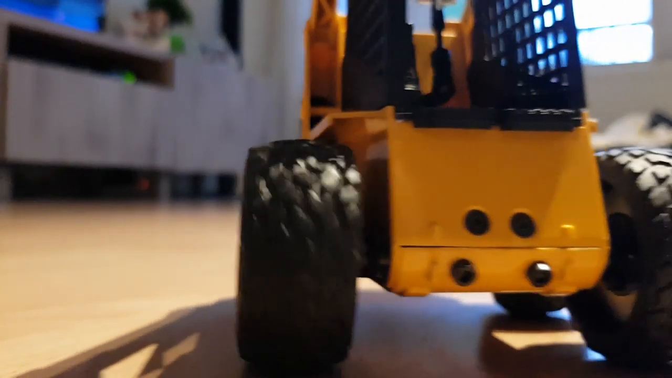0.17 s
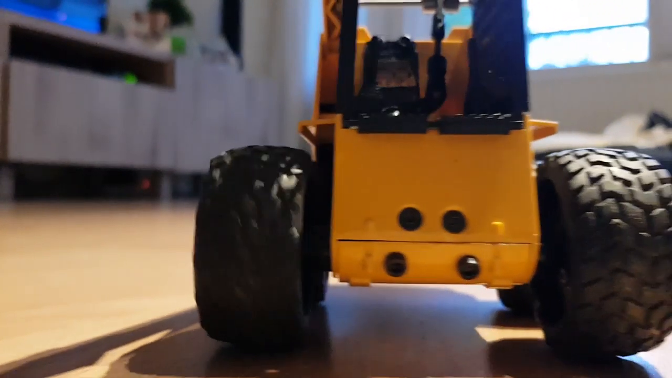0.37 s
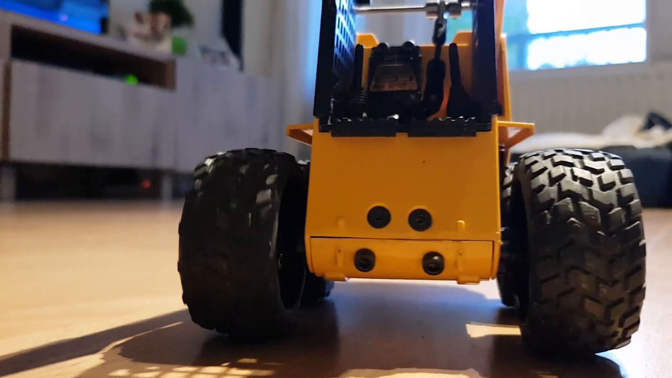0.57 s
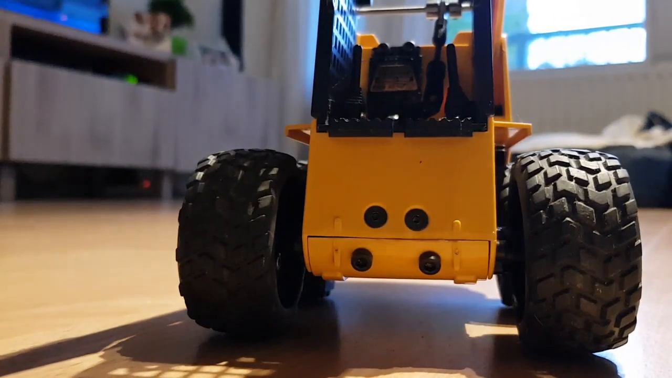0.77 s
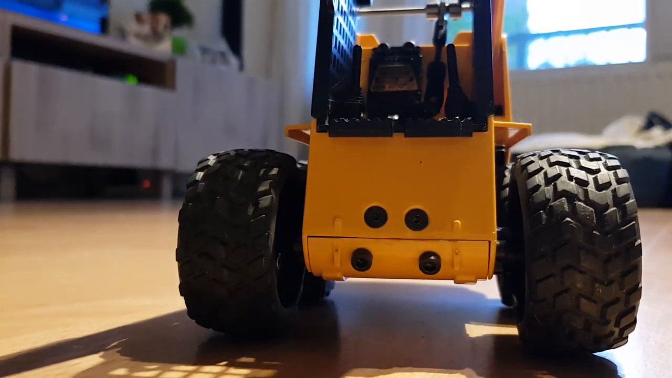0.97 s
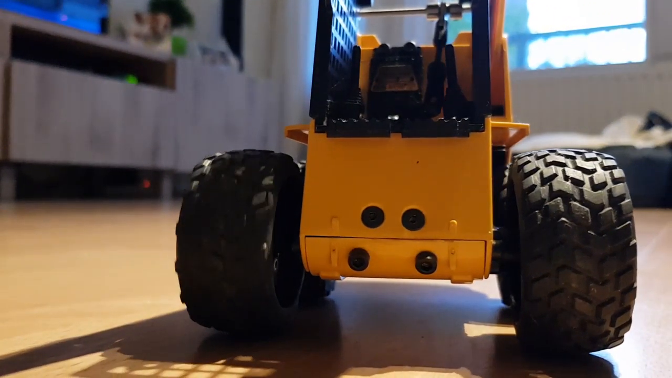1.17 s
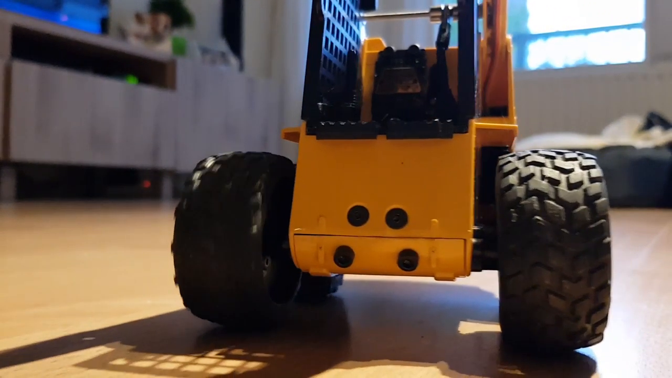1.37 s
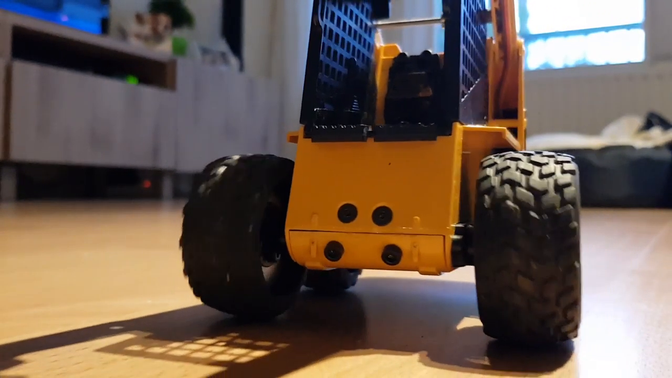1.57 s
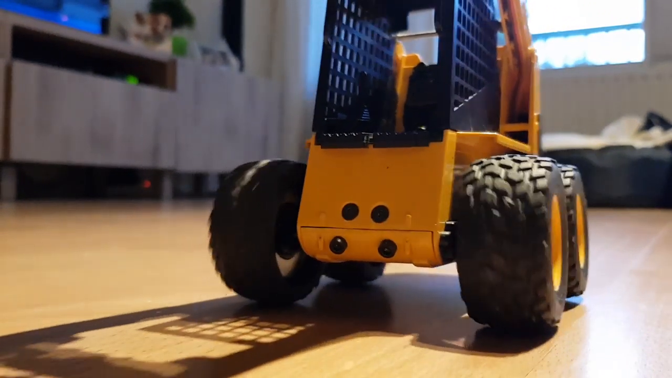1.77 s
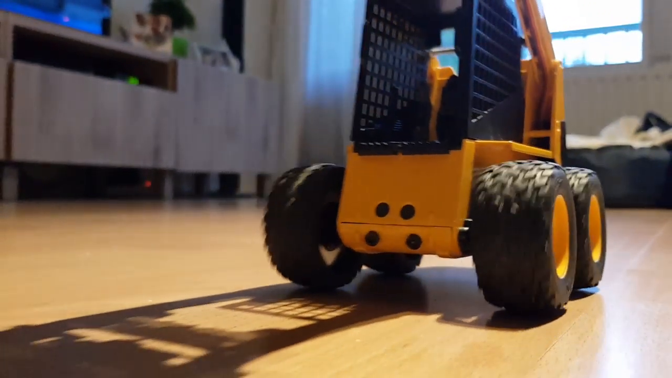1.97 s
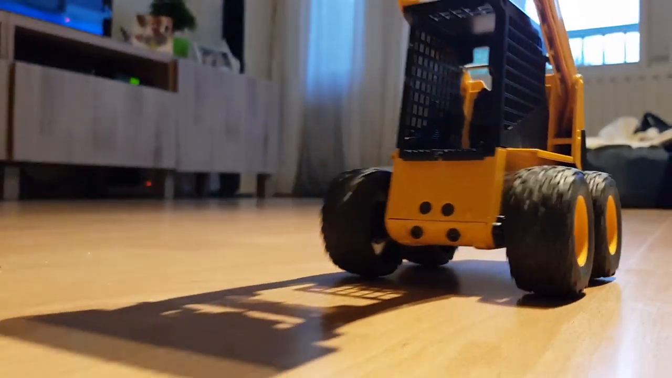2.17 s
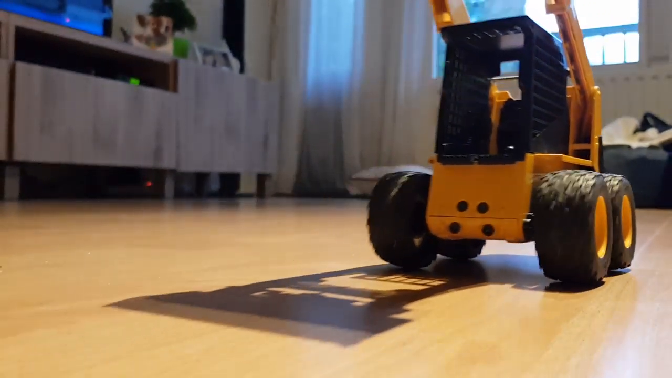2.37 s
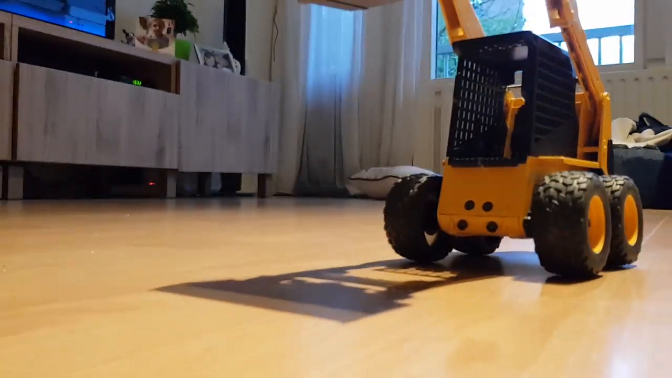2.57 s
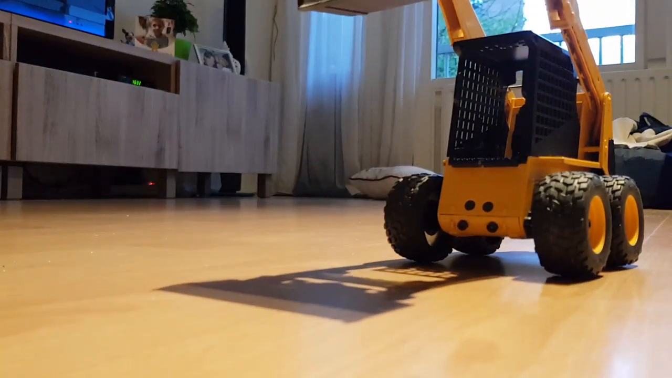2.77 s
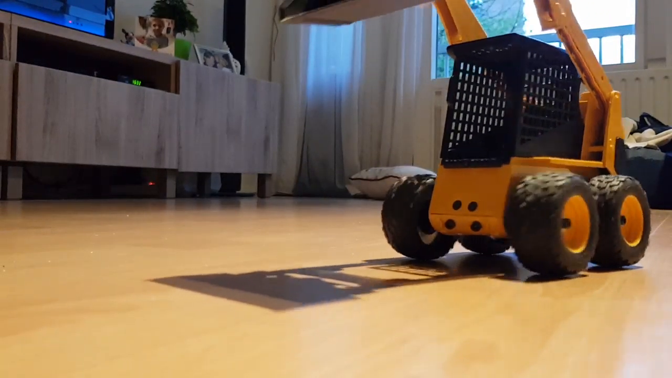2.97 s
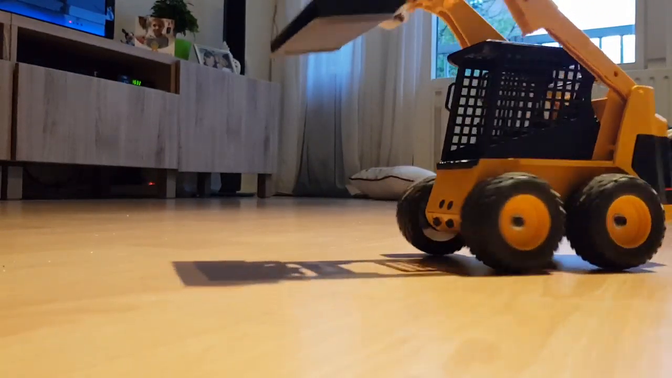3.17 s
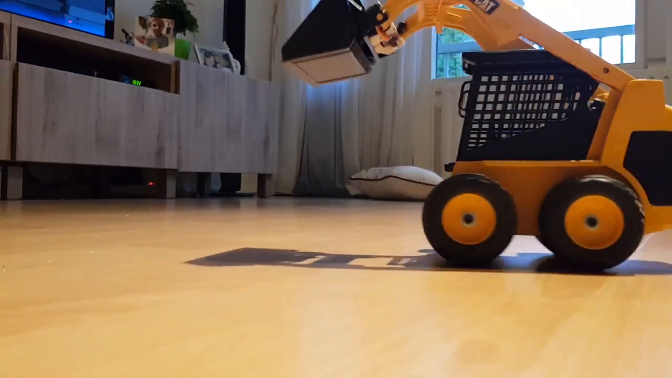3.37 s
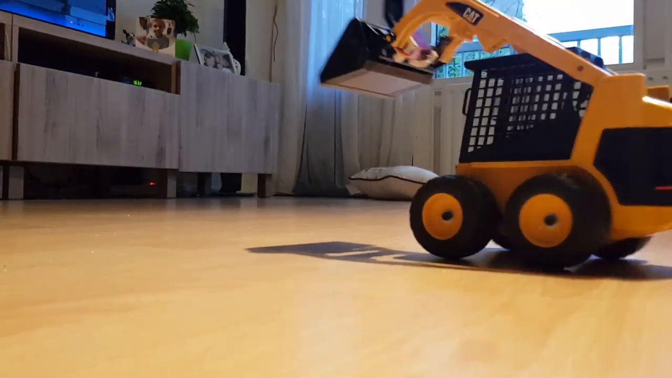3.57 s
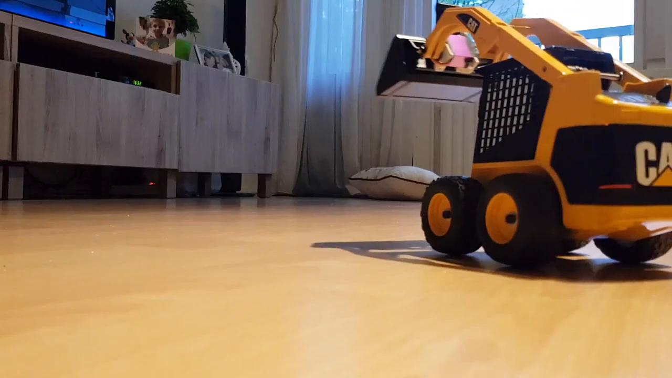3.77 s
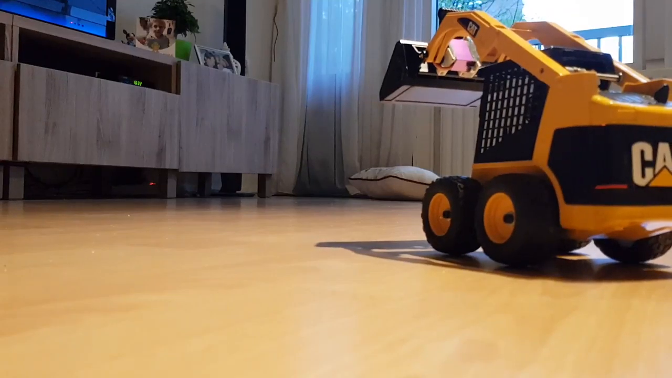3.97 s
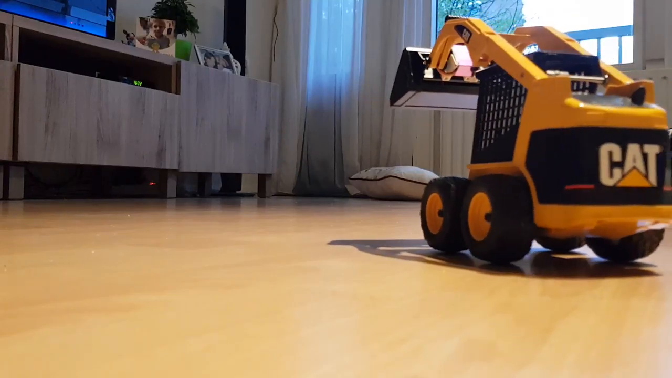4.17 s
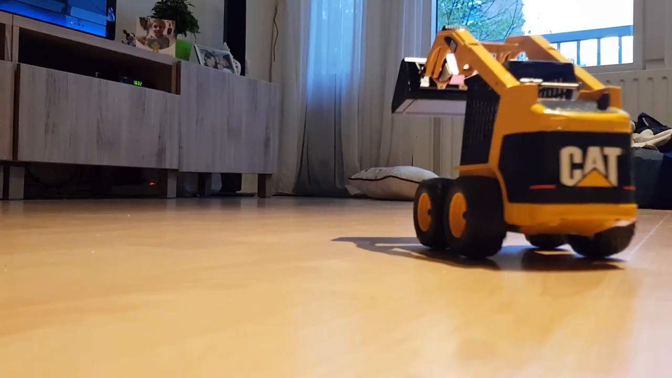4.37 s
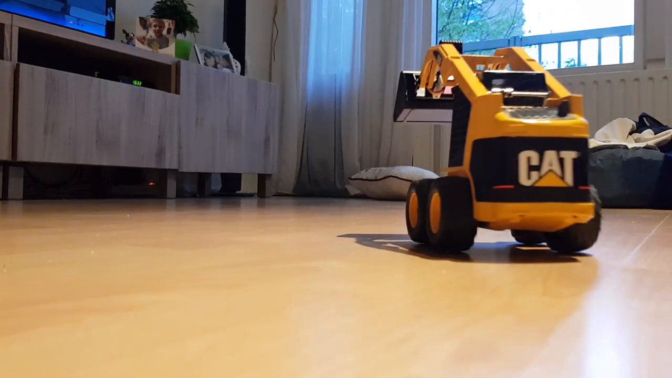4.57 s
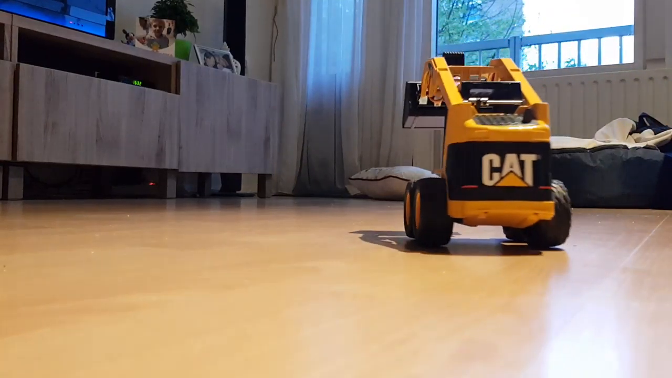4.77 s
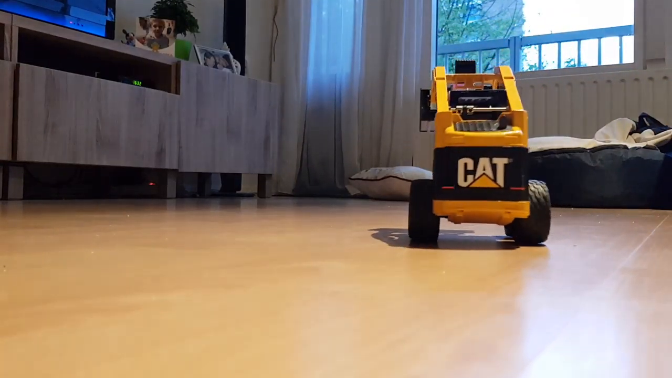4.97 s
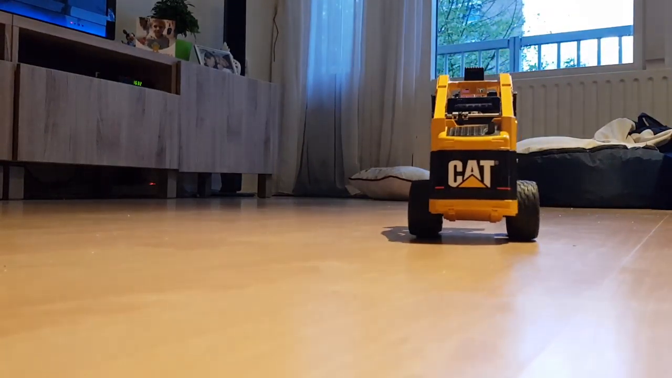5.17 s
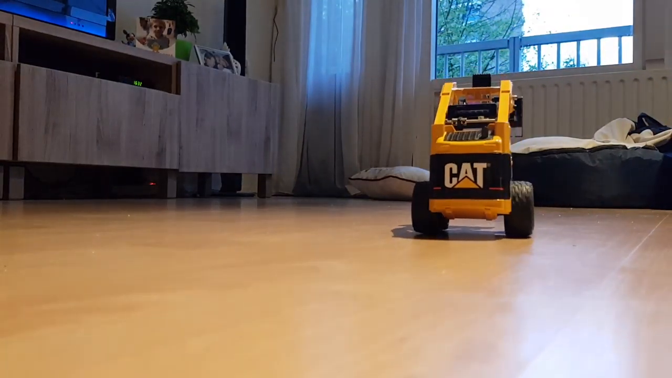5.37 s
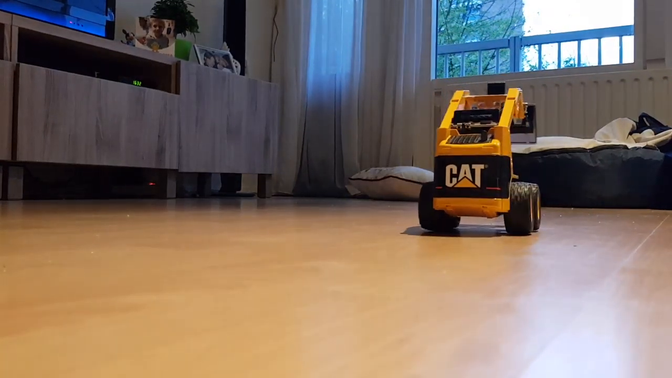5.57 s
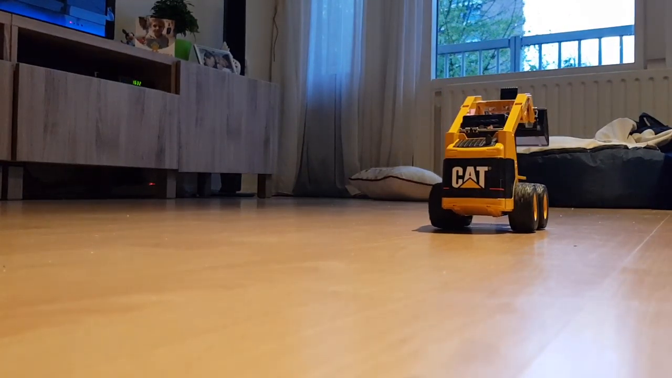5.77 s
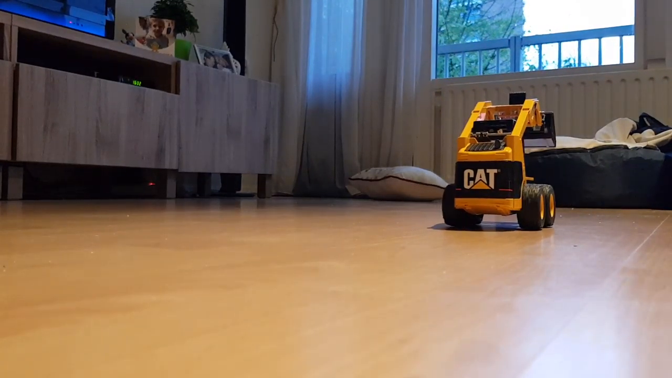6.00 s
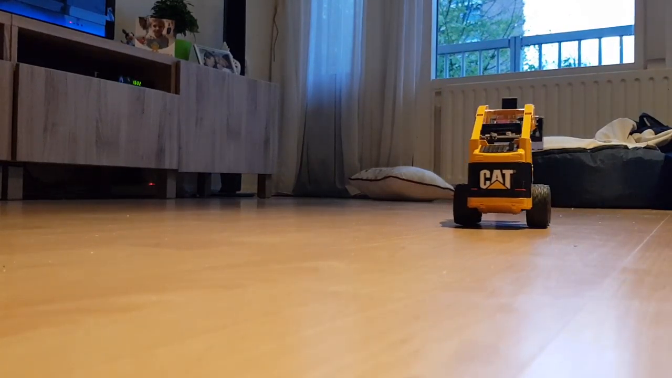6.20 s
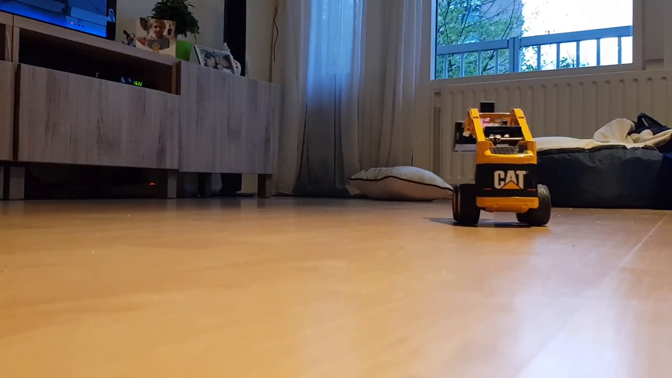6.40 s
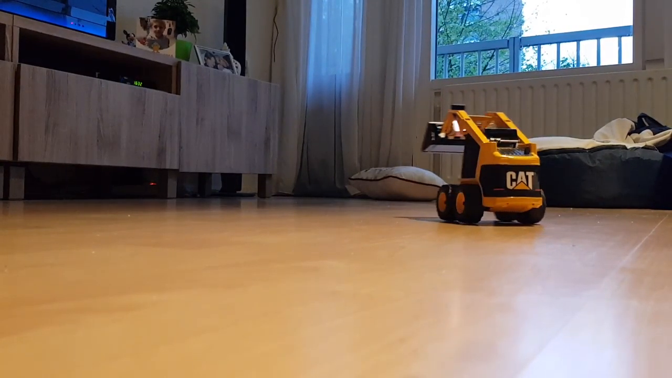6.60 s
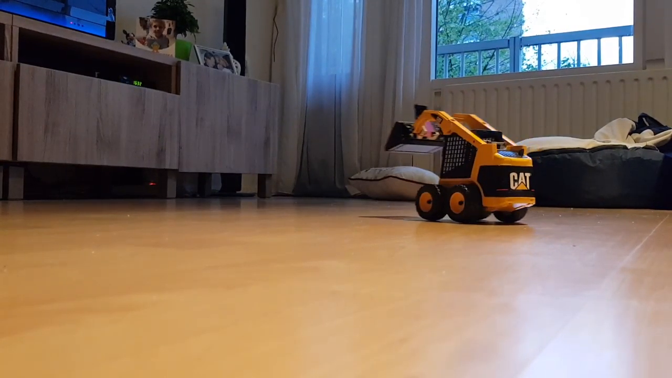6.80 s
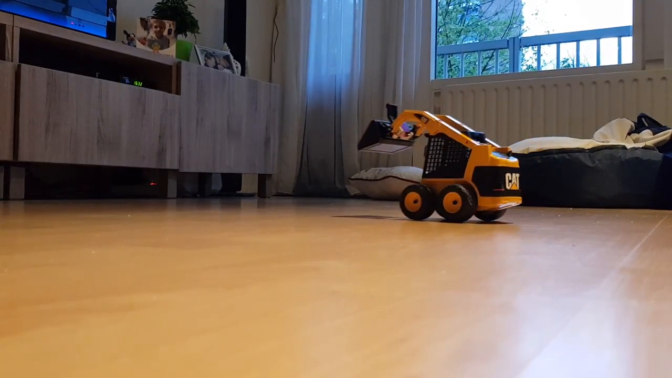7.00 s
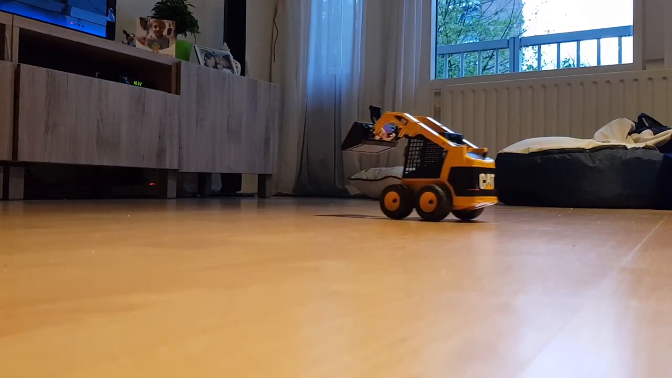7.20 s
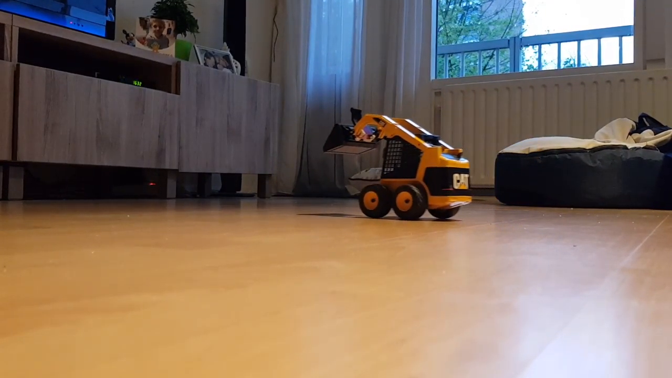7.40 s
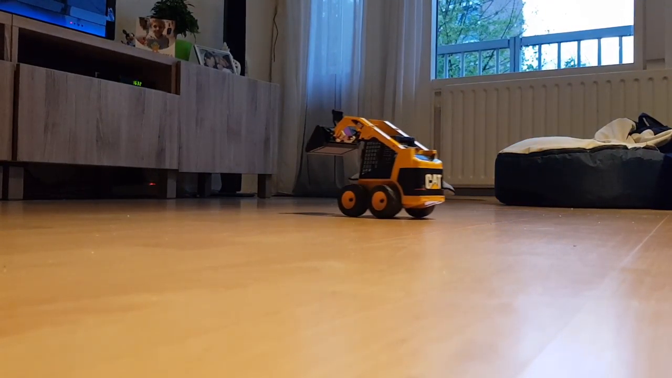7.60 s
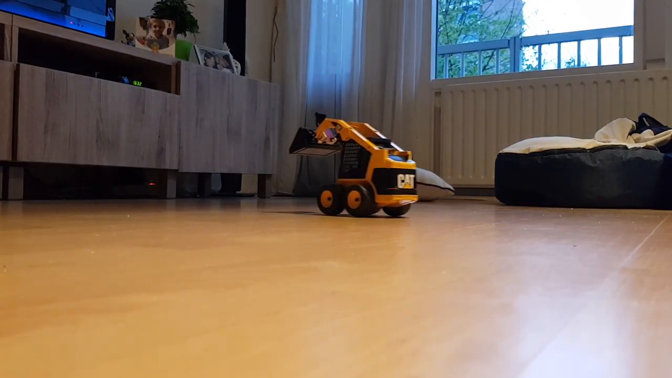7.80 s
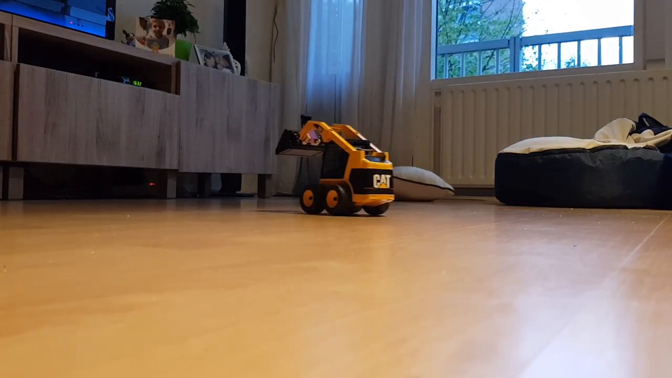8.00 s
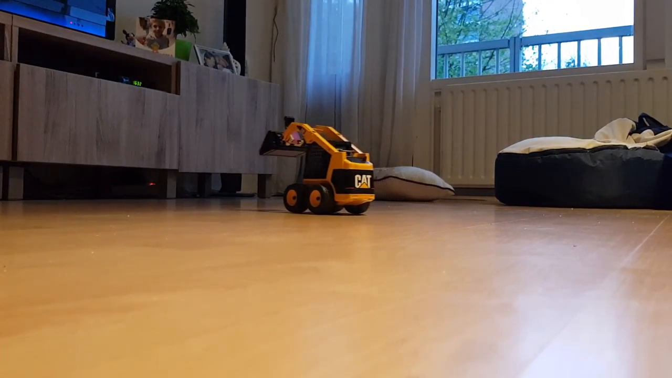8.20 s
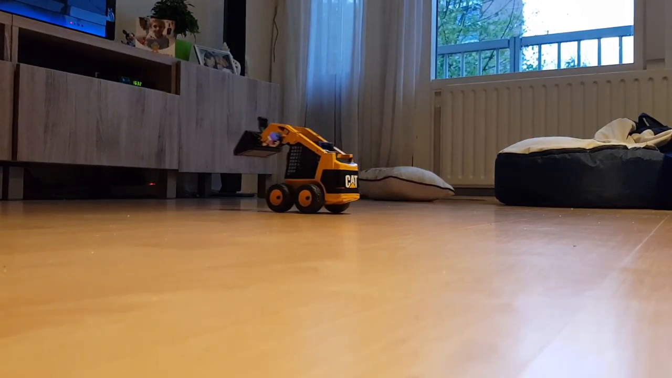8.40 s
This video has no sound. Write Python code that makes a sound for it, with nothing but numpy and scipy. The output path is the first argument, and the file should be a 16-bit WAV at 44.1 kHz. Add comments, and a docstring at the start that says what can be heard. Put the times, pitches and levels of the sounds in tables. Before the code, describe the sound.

Small motors and plastic gears of a toy vehicle whir indoors, stopping briefly three times, with clicks, thin whistles and little squeaks.

```python
"""Toy loader on a living-room floor.

A remote-controlled loader drives and turns on laminate, stopping three times, and shows its front,
flanks and rear to a close pair of microphones. Two motors rattle plastic gears in a hollow shell; the
teeth whine with speed, and the speed controller whistles as a motor pulls away. Axles squeak, slack
gears tick at rest and the tyres rumble on the boards, over short echoes and a low room tone."""
import sys
import numpy as np
from scipy import signal
from scipy.fft import rfft, irfft
from scipy.io import wavfile
from scipy.ndimage import uniform_filter1d, map_coordinates

SR = 44100
rng = np.random.default_rng(int(sys.argv[2]) if len(sys.argv) > 2 else 0)


def inscribe(sig):
    """Save sig as 16-bit PCM at rate SR to the path in sys.argv[1].

    A 1-D sig is mono; a 2-D sig holds one channel per row.
    Samples are clipped to [-1, 1] before scaling.
    """
    pcm = np.round(np.clip(np.atleast_2d(sig).T, -1, 1) * 32767)
    wavfile.write(sys.argv[1], SR, pcm.astype(np.int16))


N = 372644
T = np.arange(N) / SR
HZ = np.fft.rfftfreq(N, 1 / SR) + 1e-3
RADIO_FRAME_S = .0219


# Shell resonances, by the side turned to the microphones: pitch_hz, width_hz, level_db
FRONT_MODES = [(1430, 190, -6.5), (1980, 320, -1.5), (2400, 170, -2), (2560, 160, -1), (3210, 120, 2),
               (3400, 65, -1), (3520, 190, 2), (4040, 140, -7.5)]
CORNER_MODES = [(1260, 77, 1), (1500, 180, 2.5), (1850, 68, 4), (2400, 210, -15), (2971, 630, -1),
                (3570, 360, 1), (3830, 250, 0.5)]
FLANK_MODES = [(1194, 98, 0.5), (1620, 1200, 0), (1840, 130, 3.5), (2662, 210, 2), (3390, 630, 5),
               (3675, 250, -7)]
REAR_MODES = [(1161, 470, -8), (1380, 222, -18), (1590, 61, -4), (1850, 71, -1), (2620, 140, -3),
              (3540, 460, -2)]
FAR_FLANK_MODES = [(1282, 520, -10), (1591, 92, -1.5), (1977, 240, -7), (2453, 230, -7), (2800, 252, -6),
                   (3249, 2200, -2.5)]
# Spectrum of the tooth rasp from the same five sides: frequency_hz, level_db
FRONT_RASP = [(2350, -25), (4000, -7), (4170, -2), (4520, 1), (4900, -4.5), (5630, -1), (6510, -2),
              (7400, 4.5), (8360, 2.5), (8850, 1), (10500, 2), (11600, -3.5), (12500, 2.5), (15200, -14),
              (16000, -4)]
CORNER_RASP = [(2350, -48), (4000, -7.5), (4900, -3.5), (5700, -6.5), (6290, -3.5), (6820, -5.5), (7930, 4),
               (9220, -3.5), (10600, 0.5), (11800, -5), (12800, -5), (14000, -9), (15500, -14),
               (16000, -24)]
FLANK_RASP = [(2350, -22), (4000, 0), (4140, -4.5), (4730, -4), (6070, 0.5), (7060, -3), (7570, 2),
              (7930, 2.5), (9170, -1.5), (10500, 0.5), (15200, -8), (16000, -26)]
REAR_RASP = [(2350, -5.5), (4000, -13), (4410, -3.5), (5070, -6.5), (5800, -6.5), (7060, -3.5), (7930, 2),
             (8500, -1), (10800, -3), (13400, -11), (14800, -12.5), (15500, -15), (16000, -6)]
FAR_FLANK_RASP = [(2350, -31), (4000, -4), (5310, -4.5), (5700, -3.5), (6140, 1.5), (6860, -4.5),
                  (7750, 2.5), (9280, 0.5), (10100, 1), (13600, -8.5), (15200, -14), (16000, -24)]

def gearboxes():
    """Two gear trains at each microphone: burrs rasp and ring the shell, meshing teeth whine."""
    rasp_gain, shell_gain = drive_gains()
    tooth_hz, pinion_hz = gear_rates()
    facing, = curves(SIDE_SHOWN)
    knocks = clatter(tooth_hz, scatter_db=6, slop_s=.00004, wobble=.18)
    knocks += clatter(pinion_hz / 2, scatter_db=-.5, slop_s=.00005, wobble=.46)
    # teeth slide between knocks; short waves leave the shell differently towards each microphone
    sliding = rng.standard_normal((2, N))
    shell_drive = knocks + undb(3) * rng.standard_normal(N) + undb(3.5) * sliding
    rasp_drive = knocks + undb(9.5) * sliding
    sides = [(FRONT_MODES, FRONT_RASP), (CORNER_MODES, CORNER_RASP), (FLANK_MODES, FLANK_RASP),
             (REAR_MODES, REAR_RASP), (FAR_FLANK_MODES, FAR_FLANK_RASP)]
    shell = rasp = 0
    for side, (modes, spectrum) in enumerate(sides):
        share = np.clip(1 - abs(facing - side), 0, 1)
        shell += share * ring(shell_drive, modes)
        rasp += share * colour(rasp_drive, spectrum)
    rasp += undb(-21) * rough_overtone(10 * tooth_hz, width_hz=600)
    # the changing load shakes the treble most
    load = unit(walk(48) + walk(34))
    shell = undb(.5 * load) * shell_gain * flex(shell)
    rasp *= undb(1.15 * load + .45 * frame_sway() + 2) * rasp_gain
    return shell + rasp + whine(tooth_hz, pinion_hz, shell_gain)


# Gear speeds, one list per run: time_s, first_train_tooth_hz, second_train_pinion_hz
RUN_SPEEDS = [
    [(0, 737, 1910), (.15, 784.6, 1886), (.46, 787, 1880), (.56, 659, 1912), (.73, 601, 1475)],
    [(1.06, 585.5, 1457), (1.3, 659, 1867), (1.42, 753.6, 1928), (1.62, 754, 1925), (1.87, 896.6, 1844),
     (1.93, 589.6, 1868), (2.32, 783.3, 1962), (2.44, 610.4, 1884), (2.68, 470, 1370)],
    [(2.84, 541, 1409), (3.02, 692.3, 1740), (3.33, 825.7, 1870), (3.6, 840.5, 1930), (3.7, 702.5, 1885),
     (3.78, 591, 1727), (3.87, 517, 1500)],
    [(4.02, 554.7, 1498), (4.45, 746.2, 1846), (4.6, 785.6, 1891), (4.72, 866, 1914), (4.95, 853, 1976),
     (5.17, 780, 1859), (5.42, 864.4, 1926), (5.65, 887.3, 1949), (5.84, 771.7, 1839), (5.97, 847.5, 1920),
     (6.15, 803.7, 1980), (6.52, 799, 1867), (6.74, 888, 1947), (6.88, 803, 1842), (7.03, 569, 1633),
     (7.25, 570.5, 1628), (7.5, 761, 1827), (7.68, 872, 1849), (7.86, 914.3, 1901), (8.03, 834, 1852),
     (8.3, 949, 1968), (8.45, 966, 2108)],
]

def gear_rates():
    """Tooth and pinion rates of the two trains through all runs, in Hz."""
    return curves([row for run in RUN_SPEEDS for row in run])


# Gear noise as the toy crosses the floor, one list per run: time_s, rasp_db, shell_db
RUN_LEVELS = [
    [(0.0, -38, -36), (0.012, -41.5, -34), (0.158, -33.5, -35.5), (0.45, -33.5, -37.5), (0.616, -44, -40),
     (0.648, -41.5, -41), (0.698, -48, -44), (0.72, -50, -68), (0.735, -72, -61)],
    [(1.09, -54, -44), (1.134, -48, -43), (1.35, -40.5, -39.5), (1.386, -36, -37.5), (1.794, -30.5, -36),
     (1.94, -25.5, -33), (2.05, -27.5, -35.5), (2.262, -26, -34.5), (2.454, -32, -36), (2.498, -33, -36.5),
     (2.604, -39.5, -42), (2.68, -59, -55)],
    [(2.84, -67, -45), (2.89, -51.5, -43), (3.004, -32, -34.5), (3.192, -31, -36), (3.714, -33.5, -35.5),
     (3.76, -37.5, -40), (3.818, -41, -41.5), (3.842, -47, -60), (3.88, -57, -66)],
    [(4.02, -58, -45.5), (4.13, -41.5, -37.5), (4.2, -42.5, -38.5), (4.44, -33, -34.5),
     (5.19, -34.5, -36.5), (6.26, -32, -42), (6.36, -32.5, -46.5), (6.42, -32.5, -44.5), (6.91, -35, -47.5),
     (7.04, -38, -42), (8.45, -33.5, -40)],
]

def drive_gains():
    """Rasp and shell gains; both die quickly when the motors stop."""
    rasp = shell = 0
    for run in RUN_LEVELS:
        rasp_db, shell_db = curves(run)
        outside_s = np.maximum(0, np.maximum(run[0][0] - T, T - run[-1][0]))
        running = np.exp(-outside_s / .03)
        rasp += running * undb(rasp_db)
        shell += running * undb(shell_db)
    return rasp, shell


# Side facing the microphones: time_s, side (0 front, 1 front corner, 2 flank, 3 rear, 4 far flank)
SIDE_SHOWN = [(0, 0), (1.55, 0), (1.85, 1), (2.6, 1), (2.95, 2), (4.4, 2), (4.9, 3), (6.85, 3), (7.1, 4),
              (8.45, 4)]

def by_side(side_db):
    """Gain of a sound that leaves the toy's five sides with different strength."""
    facing, = curves(SIDE_SHOWN)
    return undb(np.interp(facing, np.arange(len(side_db)), side_db))


def clatter(tooth_hz, scatter_db, slop_s, wobble, teeth=18, burrs=70):
    """A gear's burrs strike again on every turn, a little early or late."""
    turns = np.cumsum(tooth_hz) / SR / teeth
    place, height = rng.random(burrs), rng.uniform(-.73, 1, burrs)
    strike_turns = (np.arange(int(turns[-1]))[:, None] + place).ravel()
    timing, strength = rng.standard_normal((len(strike_turns), 2)).T
    strike_s = np.interp(strike_turns, turns, T) + slop_s * timing
    # an off-centre gear presses harder on one side of each turn
    pressure = 1 + wobble * np.sin(2 * np.pi * strike_turns)
    force = np.resize(height, len(strike_turns)) * undb(scatter_db * strength) * pressure
    samples = np.clip(np.round(strike_s * SR).astype(int), 0, N - 1)
    return unit(np.bincount(samples, force, N))


def flex(x, drift=.02):
    """The resonances waver in pitch as the shell flexes."""
    place = np.arange(N) + np.cumsum(drift * walk(9))
    return np.array([map_coordinates(mic, [place], order=3, mode="mirror") for mic in x])


def frame_sway():
    """The drive slackens and recovers once in every radio frame."""
    return np.sin(2 * np.pi * T / RADIO_FRAME_S)


# Gear tones against the shell ring at cruise: front_db, corner_db, flank_db, rear_db, far_flank_db
TOOTH_SIDE_DB = (-62, -21.5, -32, -27.5, -22.5)
OCTAVE_SIDE_DB = (-16.5, -20, -17.5, -19.5, -38)
PINION_SIDE_DB = (-20, -9.5, -15, -9, -11)
# Rough overtones of the tooth rate: multiple, width_hz, side_db (five sides)
WHINE_OVERTONES = [(3, 219.6, (-39, -13, -29, -14, -9.5)), (3.5, 170, (-7, -13, -13, -24, -24)),
                   (4, 201.2, (-26, -11, -9, -16, -33)), (5.6, 601, (-12, -17, -17, -8, -18))]
# Single overtones that swell under strain: start_s, end_s, multiple, width_hz, level_db
STRAIN_SWELLS = [(1.58, 1.98, 2, 91, -44.5), (1.893, 2.49, 2, 48.5, -41), (1.75, 2.6, 2.55, 205, -47.5),
                 (2.05, 2.3, 6.9, 350, -36), (3, 3.73, 2, 110, -45), (4.59, 5.8, 5.6, 280, -45),
                 (6.08, 6.66, 2.36, 45, -49), (3.3, 3.86, 4.4, 210, -44), (4.38, 4.87, 5.8, 259.4, -45),
                 (6.1, 6.4, 3.07, 170, -43), (6.38, 6.9, 3, 180, -46), (8.2, 8.8, 3, 860, -40),
                 (7.8, 8.55, 6.2, 1160, -45), (7.65, 8.6, 9, 950, -44)]

def whine(tooth_hz, pinion_hz, shell_gain, cruise_hz=810):
    """Meshing teeth: tones and rough overtones that glide and grow with speed."""
    effort = shell_gain * (tooth_hz / cruise_hz) ** 2.1
    octave = tone(2 * tooth_hz, flutter=.01393, rough_db=-.5)
    octave += undb(-.5) * rough_overtone(2 * tooth_hz, width_hz=140)
    wavering_hz = pinion_hz * (1 + .011 * walk(14) + .012 * frame_sway())
    pinion = tone(wavering_hz, flutter=.008, rough_db=3)
    upper = by_side(OCTAVE_SIDE_DB) * octave + by_side(PINION_SIDE_DB) * pinion
    for multiple, width_hz, side_db in WHINE_OVERTONES:
        upper += by_side(side_db) * rough_overtone(multiple * tooth_hz, width_hz)
    strain = sum(swells([(start, end, db)], slew_s=.078) * rough_overtone(multiple * tooth_hz, width_hz)
                 for start, end, multiple, width_hz, db in STRAIN_SWELLS)
    return effort * (upper + by_side(TOOTH_SIDE_DB) * tooth_tone(tooth_hz)) + strain


def tooth_tone(tooth_hz):
    """The teeth sing; the three-pole rotor turns at a third of their rate and adds a side tone."""
    fundamental = tone(tooth_hz, flutter=.012, rough_db=2.2)
    third = rough_overtone(3 * tooth_hz, width_hz=120)
    side_tone = tone(4 / 3 * tooth_hz, flutter=.02, rough_db=3)
    return fundamental + undb(-5) * third + undb(-3) * side_tone


def rough_overtone(hz, width_hz, core=.7, stray=.14):
    """Loose teeth spread an overtone into a wavering line in a narrow rough band."""
    phase = 2 * np.pi * np.cumsum(hz + stray * width_hz * walk(45)) / SR
    return unit((core + walk(width_hz)) * np.sin(phase) + (core + walk(width_hz)) * np.cos(phase))


# The second motor racing and labouring, one list per turn: time_s, tooth_hz, level_db
STEERING_SWEEPS = [
    [(1.72, 471, -61), (1.81, 572, -42), (1.91, 661, -41.5), (2.0, 678.3, -42), (2.12, 714.8, -47),
     (2.27, 738, -33), (2.38, 719, -44), (2.5, 593, -40.5), (2.62, 520, -58)],
    [(3.12, 569.6, -46), (3.22, 622, -37), (3.3, 656, -36.5), (3.45, 711, -57), (3.6, 663, -40),
     (3.78, 598, -54)],
    [(4.11, 651, -60), (4.18, 687.5, -45), (4.24, 690, -59), (4.31, 699, -40), (4.37, 698, -45),
     (4.44, 670.5, -40), (4.58, 734, -38), (4.75, 788, -48)],
    [(6.84, 789.5, -45), (6.93, 625, -43), (7.02, 590, -44), (7.18, 590, -42), (7.35, 650.5, -42),
     (7.5, 735, -44), (7.78, 895.5, -43.5), (8.02, 802, -42.5), (8.45, 924, -42)],
]
# Its overtones at the microphones: multiple, width_hz, side_db (five sides)
STEERING_OVERTONES = [(3, 260, (-12, -11, -18, -10, -10.5)), (6, 700, (-2, 3.5, -4.5, -1, -0.5)),
                      (9, 760, (-6, -1, 1, -9, -3)), (12, 800, (-8, -4, -4, -9, -1.5)),
                      (15, 770, (-4, 2, -10, -21, -15))]

def steering():
    """The second motor's whine sweeps as it steers; its three poles favour every third overtone."""
    tooth_hz, db = curves([row for turn in STEERING_SWEEPS for row in turn])
    turning = swells([(turn[0][0], turn[-1][0], 0) for turn in STEERING_SWEEPS], slew_s=.018)
    overtones = sum(by_side(side_db) * rough_overtone(multiple * tooth_hz, width_hz, core=.3, stray=.22)
                    for multiple, width_hz, side_db in STEERING_OVERTONES)
    return undb(db) * turning * overtones


# The toy backs away, nose to the microphones: start_s, end_s, level_db
GROWL_SPANS = [(.09, .53, -41.5), (1.35, 1.68, -46.5)]

def growl(teeth_per_throb=9, pinion_hz=1868):
    """Two mesh tones: one throbs with an oval gear, the other warbles with the radio frame."""
    tooth_hz, _ = gear_rates()
    throb = 1 + .6 * np.sin(2 * np.pi * np.cumsum(tooth_hz) / SR / teeth_per_throb)
    mesh = unit(throb * tone(1.97 * tooth_hz, flutter=.008, rough_db=1))
    pinion = tone(pinion_hz * (1 + .024 * frame_sway()), flutter=.006, rough_db=1.5)
    return swells(GROWL_SPANS, slew_s=.07) * (mesh + pinion)


# Straight stretches across the floor: start_s, end_s, level_db
STRAIGHT_SPANS = [(4.65, 5.02, -45), (4.99, 5.09, -48), (5.29, 5.76, -47.5), (5.92, 6.06, -49),
                  (7.62, 7.98, -48.5), (8.08, 8.18, -54)]

def straight_singing():
    """On the straight both motors pull evenly and the teeth sing out."""
    tooth_hz, _ = gear_rates()
    return swells(STRAIGHT_SPANS, slew_s=.06) * tooth_tone(tooth_hz)


# A motor pulls away: start_s, full_s, fade_s, end_s, switching_hz, level_db, voice (0-2)
WHISTLE_EVENTS = [(.03, .3, .7, .725, 1124, -49.5, 2), (.5, .6, .69, .705, 1159, -53, 0),
                  (.92, .924, .939, .945, 1170, -52, 0), (.963, 1.0, 1.08, 1.3, 1170, -47, 0),
                  (2.818, 2.825, 2.86, 2.94, 1165, -48, 0), (3.943, 3.99, 4.07, 4.24, 1126, -50, 1)]
# Harmonics of the three voices: multiple, first_motor_db, second_motor_flank_db, second_motor_front_db
WHISTLE_HARMONICS = [(1, -12, -16, -18), (2, -7, -4, -7), (3, 0, -4, 0), (4, -5, -3, -18), (5, -7, -7, -9),
                     (6, -14, -13, -18), (7, -15, -3, -9), (8, -22, -17, -13), (9, -18, -14, -16),
                     (10, -15, -20, -20)]

def controller_whistle(gap_share=.2, pitch_sag=.055):
    """Chopped current makes the windings sing; each radio frame briefly slows and weakens it."""
    out = np.zeros(N)
    gap = uniform_filter1d(1. * (T / RADIO_FRAME_S % 1 < gap_share), 130)
    strength = (1 - .6 * gap) * undb(1.3 * walk(120))
    for start, full, fade, end, hz, db, voice in WHISTLE_EVENTS:
        on = (T > start) & (T < end)
        swell = np.interp(T[on], [start, start + .002, full, fade, end], [0, .65, 1, 1, .15])
        phase = 2 * np.pi * np.cumsum(hz * (1 - pitch_sag * gap[on])) / SR
        for multiple, *voice_db in WHISTLE_HARMONICS:
            out[on] += swell * undb(db + voice_db[voice]) * np.sqrt(2) * np.sin(multiple * phase)
    return out * strength


# A rotor breaks free: start_s, end_s, switching_hz, level_db
BUZZ_EVENTS = [(.46, .715, 1152, -54), (1.05, 1.38, 1161, -48.5), (2.82, 2.98, 1150, -46),
               (4.0, 4.14, 1135, -47.5)]
# Harmonics of the buzz: multiple, level_db
BUZZ_HARMONICS = [(1, -13), (2, 0), (3, -1), (4, -7), (5, -13), (7, -9)]

def brush_buzz(width_hz=320):
    """The brushes of a slowly turning rotor chop the whistle into rough lines."""
    out = np.zeros(N)
    for multiple, harmonic_db in BUZZ_HARMONICS:
        brushes = unit(1 + 1.1 * walk(width_hz))
        for start, end, hz, db in BUZZ_EVENTS:
            gain = swells([(start, end, db + harmonic_db)], slew_s=.035)
            out += gain * brushes * np.sqrt(2) * np.sin(2 * np.pi * multiple * hz * T)
    return out


# Squeaks along the way: start_s, end_s, pitch_hz, level_db
AXLE_SQUEAKS = [(0, .12, 3055, -39.5), (0, .13, 2755, -45.5), (2.703, 2.742, 2150, -55),
                (3.783, 3.832, 2160, -42), (4.07, 4.146, 2143, -42), (4.085, 4.146, 1834, -47),
                (4.722, 4.762, 2640, -37.5), (4.775, 4.815, 2600, -44), (4.908, 4.955, 2570, -40),
                (5.07, 5.1, 2450, -44), (5.115, 5.137, 3400, -38), (5.44, 5.53, 2540, -44),
                (5.55, 5.62, 2620, -44), (6.12, 6.27, 2480, -44), (8.16, 8.26, 2780, -42)]

def axle_squeaks():
    """Dry axles sing for a moment."""
    out = 0
    for start, end, hz, db in AXLE_SQUEAKS:
        envelope = np.interp(T, [start, start + .008, end - .004, end], [0, 1, 1, 0])
        out += undb(db) * envelope * tone(hz, flutter=.012, rough_db=3)
    return out


# Gears drop into their backlash: time_s, level_db, brightness_db, decay_s
BACKLASH_TICKS = [(0.7548, -28.5, -29, .0045), (.855, -46, -3, .002), (.885, -44, -4, .002),
                  (.896, -47, -4, .0015), (2.7628, -33.5, 3.5, .0013), (3.903, -33, -10, .004),
                  (4.033, -43, 0, .002)]
# Spectrum of the snap: frequency_hz, level_db
SNAP_SPECTRUM = [(3000, 7), (4800, 3), (7300, 3), (9000, -7), (11300, -6), (15000, -9)]

def gear_ticks():
    """Slack gears click as the toy rocks to rest: a hard snap and a short ring of the shell."""
    shell, snap = np.zeros(N), np.zeros(N)
    for start, db, bright_db, decay_s in BACKLASH_TICKS:
        blow = undb(db) * (T >= start) * np.exp(-abs(T - start) / decay_s)
        shell += blow
        snap += blow * undb(bright_db)
    noise = rng.standard_normal(N)
    return .27 * shell * ring(noise, FRONT_MODES) + snap * colour(noise, SNAP_SPECTRUM)


# The toy rocks where it has stopped: start_s, end_s, level_db, lower_ring_hz, upper_ring_hz
CHATTER_SPANS = [(.747, .768, -51, 1500, 2900), (.789, .818, -50, 1450, 2600),
                 (.833, .915, -51, 1450, 2650), (.937, 1.02, -49.5, 1550, 2600),
                 (2.7, 2.76, -52.5, 1700, 3000), (2.769, 2.86, -47, 1800, 3000),
                 (3.901, 3.918, -50, 2050, 2750), (3.94, 4.025, -54, 2250, 3200)]

def gear_chatter(rate_hz=84, half_width_hz=290):
    """Stalled gears knock to and fro in their backlash; the shell rings differently at each stop."""
    knocks = unit(np.exp(-(T * rate_hz % 1) / .4) * rng.standard_normal(N))
    out = np.zeros(N)
    for start, end, db, *rings_hz in CHATTER_SPANS:
        on = (T > start) & (T < end)
        bands = [signal.butter(3, [hz - half_width_hz, hz + half_width_hz], "band", fs=SR, output="sos")
                 for hz in rings_hz]
        low, high = (unit(signal.sosfilt(band, knocks[on])) for band in bands)
        envelope = np.interp(T[on], [start, start + .002, end - .006, end], [0, 1, 1, 0])
        out[on] += undb(db) * envelope * unit(low + undb(1) * high)
    return out


# Spectrum of tyres on laminate: frequency_hz, level_db
TYRE_SPECTRUM = [(170, -11), (250, -12.5), (340, -8.5), (440, -2), (530, 2.5), (620, -1), (720, -6.5),
                 (830, -3), (1100, -5.5)]
# Tyres against the tooth rasp: front_db, corner_db, flank_db, rear_db, far_flank_db
TYRE_SIDE_DB = (-24, -22.5, -21, -20.5, -22.5)
# Tyres jolt the floor: time_s, level_db, decay_s
FLOOR_JOLTS = [(1.15, -56.5, 0.016), (1.92, -64, 0.25), (2.2, -59, 0.2), (6.641, -57, 0.19)]
# Boards that ring as the toy crosses them: time_s, pitch_hz, level_db
BOARD_CROSSINGS = [(.3, 580, -60), (.35, 350, -68.5), (6.0, 470, -68), (2.2, 456, -64), (2.25, 255.5, -68),
                   (2.3, 736, -60), (3.55, 587, -54), (4.9, 524, -62), (7.45, 400.4, -65),
                   (7.9, 517, -62.5), (8.3, 388, -71)]

def tyres(pivot_s=6.58, crossing_s=.36):
    """Tread blocks patter as hard as the gears drive; the boards ring and carry jolts."""
    tooth_hz, _ = gear_rates()
    drive, _ = drive_gains()
    # the tyres hardly roll during the slow turn on the spot
    pivot_dip = undb(-12 * np.exp(-((T - pivot_s) / .4) ** 2))
    patter = clatter(tooth_hz, scatter_db=3, slop_s=.0007, wobble=.2) + rng.standard_normal(N)
    rumble = drive * by_side(TYRE_SIDE_DB) * pivot_dip * colour(patter, TYRE_SPECTRUM)
    jolts = sum(undb(db) * (T > s) * np.exp(-abs(T - s) / decay_s) for s, db, decay_s in FLOOR_JOLTS)
    floor = colour(rng.standard_normal(N), [(35, -18), (80, -4), (230, -5.5), (330, -4), (600, -3)])
    boards = 0
    for s, hz, db in BOARD_CROSSINGS:
        contact = np.clip(1 - abs(T - s) / crossing_s, 0, 1)
        boards += contact * undb(db) * ring(patter, [(hz, 37, 0)], low_hz=1.1 * hz, high_hz=.97 * hz)
    return rumble + boards + jolts * floor


# Loose places in the floor: start_s, end_s, level_db
LOOSE_BOARD_SPANS = [(5.63, 5.88, -61), (6.05, 6.45, -67), (6.55, 6.96, -62), (7.46, 8.2, -66)]

def board_hum():
    """Loose boards pick up the rotor's unbalance."""
    _, pinion_hz = gear_rates()
    return swells(LOOSE_BOARD_SPANS, slew_s=.098) * tone(pinion_hz / 7.5, flutter=.025, rough_db=3.5)


# The toy's bearing from the microphone pair: time_s, left_lag_samples
MICROPHONE_LAG = [(0, 2), (.7, -1), (1.8, -1.5), (2.25, 3.5), (3.2, 5.5), (4.3, 6), (5.25, 4), (6.8, 4.5),
                  (8.45, -0.5)]

def living_room(diffuse, clear, wet_db=-5, wet_rise_db=2, places=36):
    """The close pair hears the toy with a small lag; its echoes change and grow as it moves off."""
    lag, = curves(MICROPHONE_LAG)
    pan_db = 1.5 - .33 * lag  # left minus right
    direct = np.array([map_coordinates(mic, [np.arange(N) - side * lag / 2]) * undb(side * pan_db / 2)
                       for mic, side in zip(diffuse + clear, (1, -1))])
    sent = diffuse + undb(-8) * clear  # clear tones arrive mostly by the straight path
    reflected = np.zeros((2, N + SR))
    for place in range(places):
        near = np.clip(1 - abs(T / T[-1] * (places - 1) - place), 0, 1)
        span = np.flatnonzero(near)
        answer = signal.fftconvolve(sent[:, span] * np.sqrt(near[span]), echoes(), axes=1)
        reflected[:, span[0]:span[0] + answer.shape[1]] += answer
    wet = undb(wet_db + wet_rise_db * T / T[-1])
    return (direct + wet * reflected[:, :N]) / np.sqrt(1 + wet ** 2)


def echoes(t60_low_s=.19, t60_high_s=.037):
    """The room's answer at both microphones from one place on the floor."""
    t = T[:SR // 3]
    hz = np.fft.rfftfreq(len(t), 1 / SR)
    treble = hz / (hz + 4000)
    # floor and cupboard throw back a strong early cluster
    noise = rng.standard_normal((2, len(t))) * (t > .001) * (1 + 2 * np.exp(-t / .0055))
    low, high = (rfft(noise * undb(-60 * t / t60)) for t60 in (t60_low_s, t60_high_s))
    mid, side = low * (1 - treble) + high * treble
    alike = .75 / (1 + (hz / 1450) ** 4)  # long waves reach both microphones alike
    tail = irfft(mid * np.sqrt(1 + alike) + np.array([[1], [-1]]) * side * np.sqrt(1 - alike))
    return tail / np.sqrt(np.sum(tail ** 2) / 2)


# Rumble of the room around the microphones: frequency_hz, level_db
ROOM_SPECTRUM = [(25, -21), (50, -9), (68, -6), (85, -5), (100, -7), (140, -5.5), (175, -14.5), (260, -19),
                 (350, -23.5), (600, -33), (900, -26)]

def room_tone(hum_hz=102):
    """Low room rumble with a faint hum and hiss."""
    mid, side = (colour(rng.standard_normal(N), ROOM_SPECTRUM) for _ in range(2))
    rumble = mid + undb(-8.5) * side * np.array([[1], [-1]])
    hum = tone(hum_hz, flutter=.039, rough_db=-7.5)
    hiss_spectrum = [(1100, -9), (3000, 12.5), (5500, 1), (15000, -7)]
    hiss = np.array([colour(rng.standard_normal(N), hiss_spectrum) for _ in range(2)])
    return undb(-67.5) * rumble + undb(-69.5) * hum + undb(-57) * hiss


def ring(x, modes, low_hz=1120, high_hz=4500):
    """A body's resonances; it radiates little outside low_hz to high_hz."""
    power = sum(undb(2 * db) / (1 + (2 * (HZ - hz) / width) ** 2) for hz, width, db in modes)
    edges = 1 / (1 + (low_hz / HZ) ** 16) / (1 + (HZ / high_hz) ** 16)
    return unit(irfft(rfft(x) * np.sqrt(power * edges), N))


def colour(x, spectrum):
    """Filter by a (frequency_hz, level_db) outline that falls away beyond its ends."""
    hz, db = np.transpose(spectrum)
    skirts = np.minimum(HZ / hz[0], 1) ** 4 * np.minimum(hz[-1] / HZ, 1) ** 4
    gain = undb(np.interp(np.log(HZ), np.log(hz), db))
    return unit(irfft(rfft(x) * skirts * gain, N))


def tone(hz, flutter, rough_db):
    """A sine whose pitch and strength shake at random."""
    phase = 2 * np.pi * np.cumsum(hz * (1 + flutter * walk(70))) / SR
    return unit(np.sin(phase) * undb(rough_db * walk(60)))


def walk(rate_hz):
    """Random levels, rate_hz of them a second, joined by ramps; rms 1."""
    hold = int(SR / rate_hz)
    steps = np.repeat(rng.standard_normal(N // hold + 1), hold)
    return unit(uniform_filter1d(steps, hold)[:N])


def swells(events, slew_s):
    """Gain of events that rise, hold and fall."""
    return sum(undb(db) * np.clip(np.minimum(T - start, end - T) / slew_s, 0, 1)
               for start, end, db in events)


def curves(table):
    """A table's columns, joined by straight lines in time."""
    time_s, *columns = np.transpose(table)
    return [np.interp(T, time_s, column) for column in columns]


def undb(db):
    """Decibels to gain."""
    return 10 ** (np.asarray(db) / 20)


def unit(x):
    """Scale to rms 1."""
    return x / np.sqrt(np.mean(x ** 2))


def scene():
    """The toy on the living-room floor, heard from the microphone pair."""
    clear = controller_whistle() + axle_squeaks() + growl() + straight_singing() + board_hum()
    clear += gear_chatter() + gear_ticks()
    diffuse = gearboxes() + steering() + brush_buzz() + tyres()
    return living_room(diffuse, clear) + room_tone()


def record(dry, top_hz=15850):
    """The recorder cuts the top of the treble steeply."""
    return signal.sosfilt(signal.ellip(12, .1, 90, top_hz, fs=SR, output="sos"), dry)


dry = scene()
out = record(dry)
inscribe(out)
```